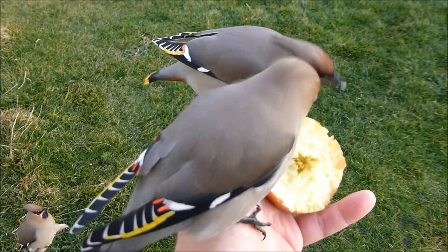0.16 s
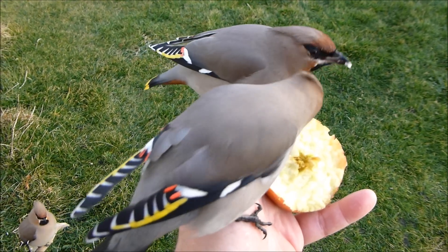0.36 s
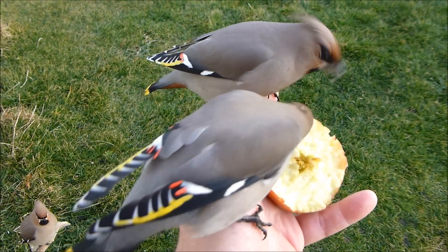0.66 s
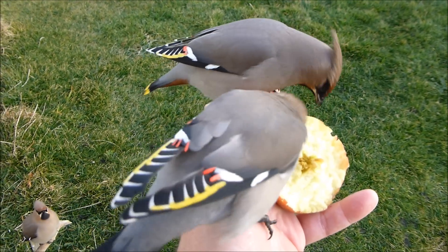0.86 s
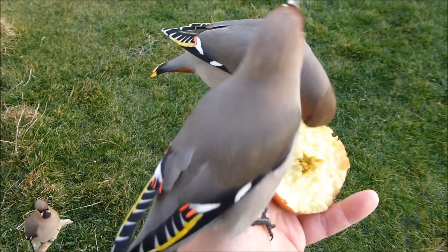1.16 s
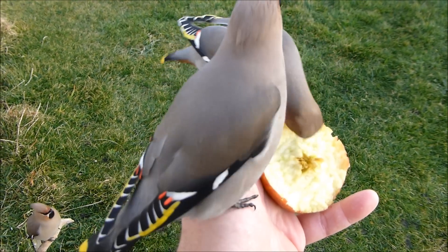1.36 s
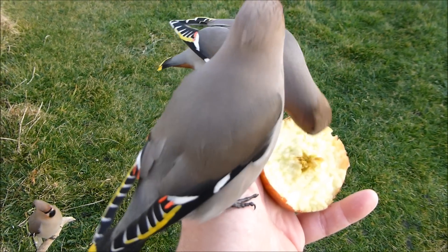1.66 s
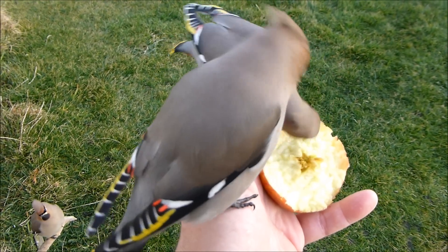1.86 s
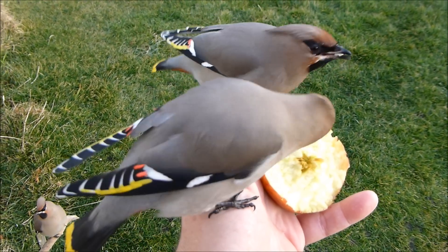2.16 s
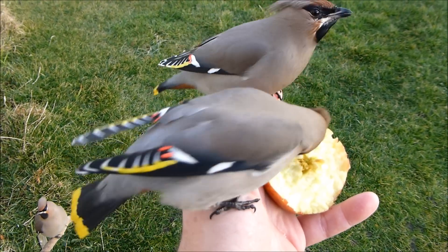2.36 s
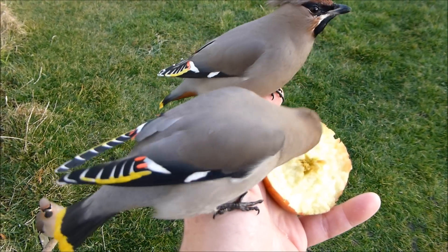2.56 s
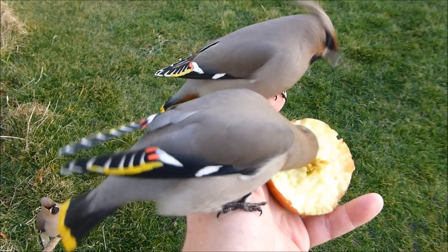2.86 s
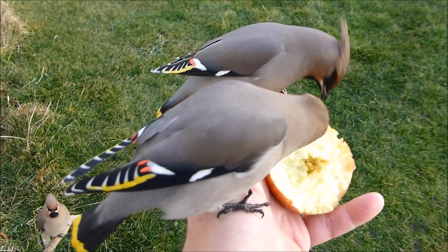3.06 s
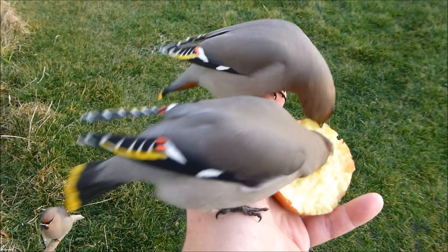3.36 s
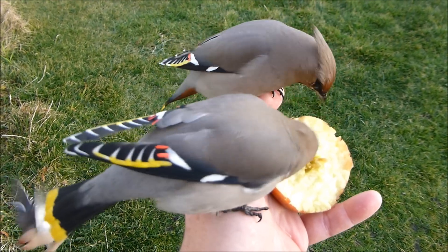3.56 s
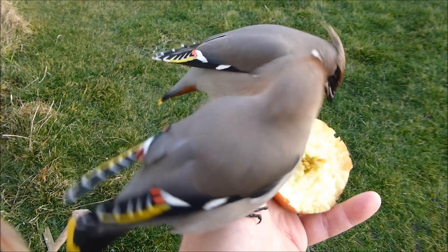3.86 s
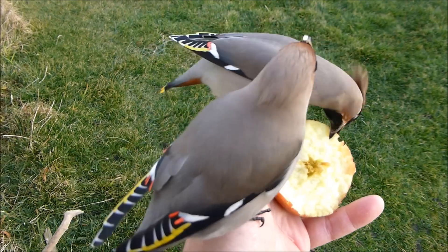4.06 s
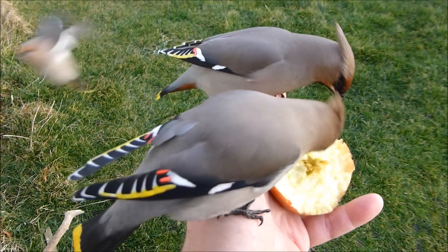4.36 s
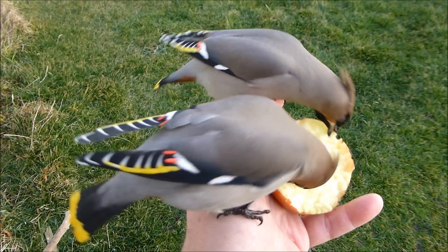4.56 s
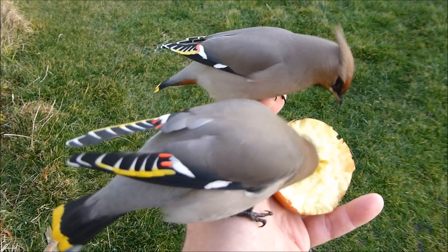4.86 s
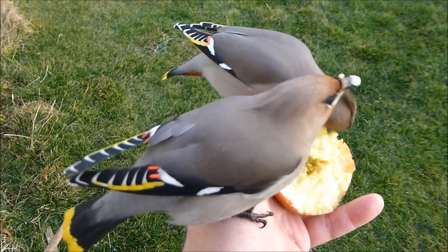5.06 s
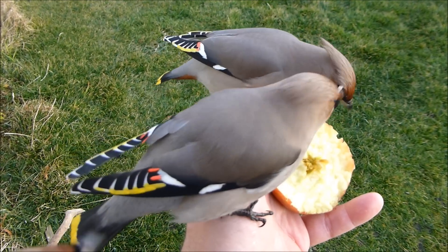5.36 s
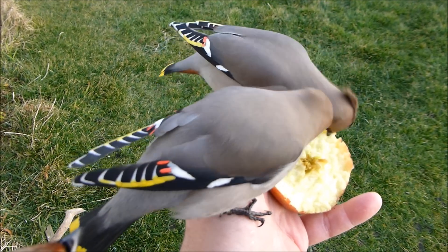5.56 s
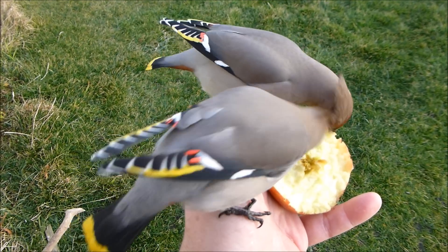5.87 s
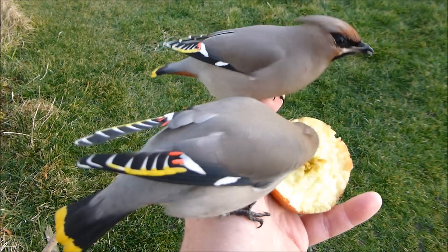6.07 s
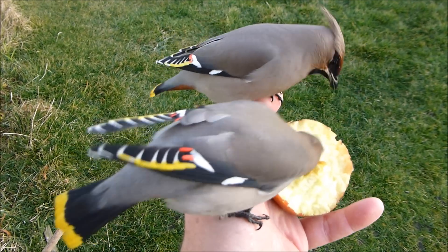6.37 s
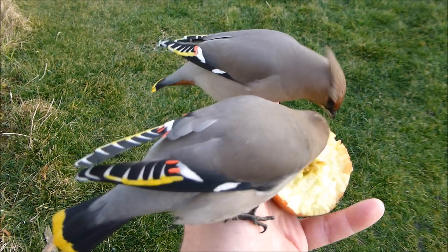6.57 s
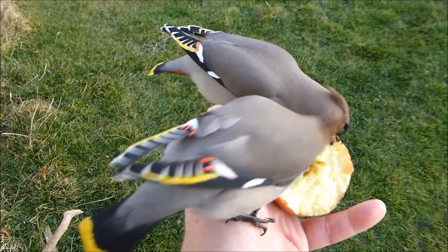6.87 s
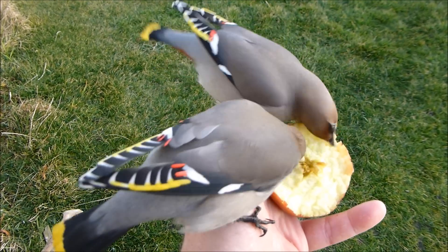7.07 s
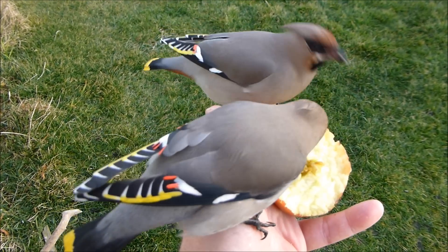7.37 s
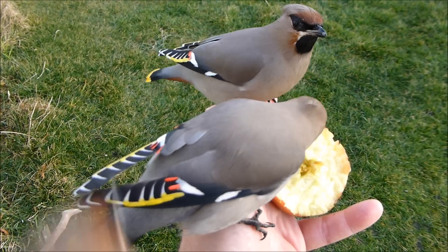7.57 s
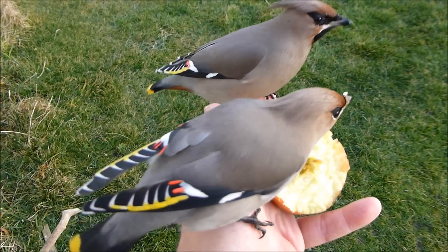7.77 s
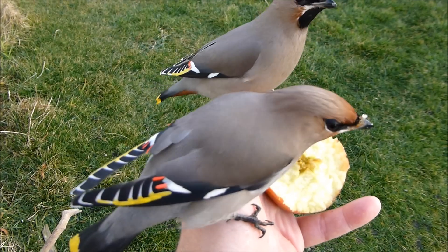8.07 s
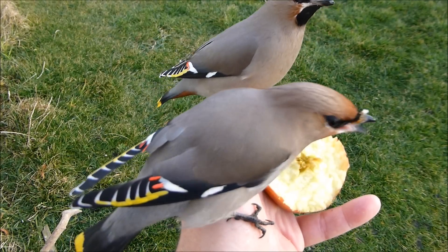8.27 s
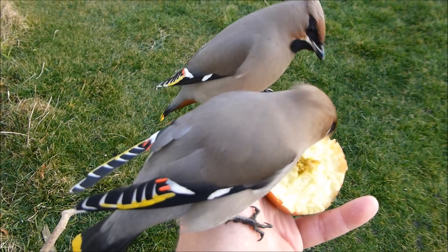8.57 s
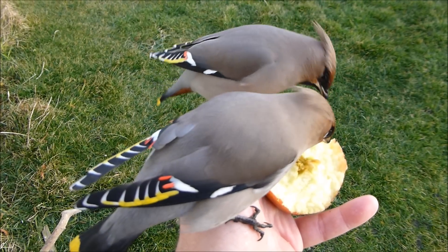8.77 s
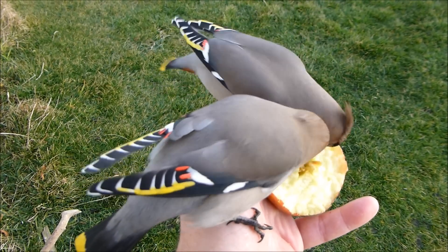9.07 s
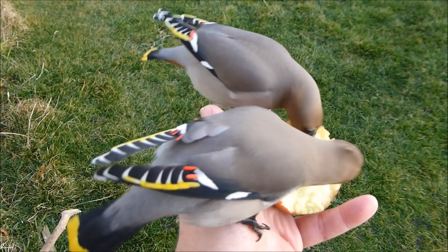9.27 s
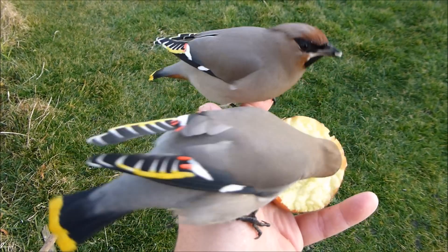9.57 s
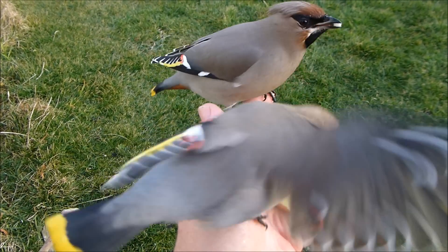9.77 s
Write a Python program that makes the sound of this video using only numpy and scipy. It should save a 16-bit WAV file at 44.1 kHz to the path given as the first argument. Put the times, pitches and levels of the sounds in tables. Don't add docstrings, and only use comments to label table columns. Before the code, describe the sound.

Small birds give short, high, downward-sliding trills while beaks tick and crunch at apple; handling bumps and one loud hard knock interrupt the quiet lawn.

```python
import sys
import numpy as np
from scipy import signal
from scipy.fft import rfft, irfft, next_fast_len
from scipy.io import wavfile
from scipy.ndimage import uniform_filter1d

SR = 44100
rng = np.random.default_rng(int(sys.argv[2]) if len(sys.argv) > 2 else 0)


def pcm_store(signal):
    levels = np.round(np.clip(np.atleast_2d(signal), -1, 1) * 32767)
    wavfile.write(sys.argv[1], SR, levels.astype(np.int16).T)


def how_loud(loudness_db):
    steps = np.asarray(loudness_db, float) / 20
    return 10 ** steps


N = 437031
TIME = np.arange(N) / SR
FFT_SIZE = next_fast_len(N)
BINS = np.maximum(np.arange(FFT_SIZE // 2 + 1) * SR / FFT_SIZE, 1)


def shaped(x, gain):
    return irfft(rfft(x, FFT_SIZE) * gain, FFT_SIZE)[:N]


def colour(x, points):
    hz, db = np.transpose(points)
    top_loss_db = 20 * np.clip((BINS - 15500) / 110, 0, 3)
    return shaped(x, how_loud(np.interp(np.log(BINS), np.log(hz), db) - top_loss_db))


def band(x, lo_hz, hi_hz):
    sos = signal.butter(3, [lo_hz, min(hi_hz, 0.45 * SR)], "bandpass", fs=SR, output="sos")
    return signal.sosfilt(sos, x)


def rms(x):
    return np.sqrt(np.mean(x ** 2))


def walk(rate):
    hold = int(SR / rate)
    targets = np.repeat(rng.standard_normal(N // hold + 1), hold)
    level = uniform_filter1d(targets, hold)[:N]
    return level / level.std()


def pan(db):
    gains = how_loud(np.array([db, -db]) / 2)
    return 2 * gains / gains.sum(0)


def add(out, s, sound, pan_db):
    i = int(s * SR)
    out[:, i:i + len(sound)] += pan(pan_db)[:, None] * sound[:N - i]


def grit(rate, flicker_db, spread_db, smear):
    breaks = (rng.random(N) < rate / SR) * how_loud(spread_db * np.minimum(rng.exponential(size=N), 2))
    breaks = signal.lfilter([1], [1, -min(smear, 0.999)], breaks)
    patches = how_loud(flicker_db * (walk(60) + 0.89 * walk(250)))
    return rng.standard_normal(N) * (1 + breaks) * patches


def tilted(x, bright_db):
    # (f/Hz, level/dB per Hz)
    rustle_colour = [(710, -36), (1200, -9), (1820, -4.5), (2150, -4), (4020, -1), (5790, -3),
                     (10100, -5.5), (14500, -11.5)]
    x = colour(x, rustle_colour)
    low, high = band(x, 990, 5160), band(x, 4820, 29000)
    low = low / rms(band(low, 1600, 4550))
    high = high / rms(band(high, 6570, 14100))
    return low + how_loud(bright_db) * high


def lawn():
    # (f/Hz, level/dB per Hz)
    lawn_colour = [(17, -24), (30, -15), (127, -8.5), (350, 0.6), (1630, -9.5), (3200, -17), (5000, -14.5),
                   (14500, -24)]
    # (f/Hz, likeness from 0 to 1)
    likeness = [(60, 0.5), (130, 0.84), (290, 0.93), (640, 0.33), (1410, 0), (3100, 0), (6820, 0.08),
                (15000, 0)]
    level_db = -55.5
    hz, like = np.transpose(likeness)
    like = np.clip(np.interp(np.log(BINS), np.log(hz), like), 0, 1)
    mid = shaped(colour(rng.standard_normal(N), lawn_colour), np.sqrt(1 + like))
    side = shaped(colour(rng.standard_normal(N), lawn_colour), np.sqrt(1 - like))
    both = np.array([1.08 * (mid + side), mid - side])
    low_breath = band(both, 100, 880) * (how_loud(1.9 * walk(4)) - 1)
    high_breath = band(both, 1900, 4300) * (how_loud(1.6 * walk(6) - 1.0) - 1)
    both = both + low_breath + high_breath
    return both * how_loud(level_db) / rms(both.mean(0))


def far_calls():
    # (t/s of the middle, half length/s, f/Hz, level/dB)
    calls = [
        (3.5, 0.13, 1640, -67),
        (5.58, 0.16, 1650, -65),
    ]
    flutter = walk(110)
    out = np.zeros(N)
    for s, half_s, hz, db in calls:
        swell = np.exp(-((TIME - s) / half_s) ** 2)
        phase = 2 * np.pi * np.cumsum(hz + 110 * walk(90)) / SR
        out += how_loud(db + 2.7 * flutter) * swell * np.sin(phase)
    return np.array([out, out])


def moves():
    # (t/s of the peak, rumble level/dB, swell/s by 10 dB, fade/s by 10 dB, cloth against rumble/dB)
    shifts = [(0.1, -57.5, -1, 1.3, -9), (.6, -53.5, 0, 0.2, -1.5), (.97, -46, 0.13, 0.27, -9.5),
              (1.12, -48, 0.16, 0.2, -14), (1.39, -44, 0.13, 0.1645, -6.5), (1.8, -56.5, 1.5, 0.04, -7),
              (2.6, -61, 1.5, -1, -25), (3.55, -55, -0.25, 0.6, -7), (3.85, -44.5, 0.18, 0.13, -5),
              (4.02, -51.5, 0.03, 0.65, -11), (4.55, -53.5, 0.25, 0.18, -3.5), (5.4, -60, 0.1, 0.2, -9.5),
              (5.85, -61.5, 0.2, 0.5, -8), (6.83, -62, 0.2, 1.5, 4.5), (7.4, -52, 0.1, 0.77, -4),
              (7.73, -36, 0.02, 0, -12), (7.78, -35, 0.0233, -0.0263, -28),
              (7.869, -32, 0.0532, -0.0869, -31), (7.94, -38, 0, -0.06, -25), (8.28, -79, 2, 7, -23),
              (8.62, -58.5, -0.7, -0.4, -27), (8.8, -69.5, 1, 2, 7.5), (9.9, -54, 0.5, 1.1, -6)]
    still_rumble_db, still_cloth_db = -67.5, -81
    rumble, cloth = how_loud(2 * still_rumble_db), how_loud(2 * still_cloth_db)
    t = TIME[::64]
    for s, db, swell_s, fade_s, cloth_db in shifts:
        distance = np.maximum((s - t) / abs(swell_s), (t - s) / abs(fade_s))
        power = how_loud(2 * db - 20 * distance)
        rumble = rumble + power
        cloth = cloth + power * how_loud(2 * cloth_db)
    return [np.interp(TIME, t, 10 * np.log10(p)) for p in (rumble, cloth)]


def sleeve():
    db = moves()[1]
    bright_db = 3 - 0.38 * (db + 62.0)
    near, stray = (how_loud(db) * tilted(grit(90, 1.56, 4.1, 0.897), bright_db) for _ in range(2))
    right_only = np.array([[0], [0.25]])
    return near * pan(12.8)[:, None] + right_only * stray


def handling():
    # (f/Hz, level/dB per Hz)
    body_colour = [(30, -53), (104, -4), (171, -0.5), (812, -3), (1590, -12.5), (2500, -15), (3250, -51),
                   (5500, -120)]
    # (breaks per s, flicker/dB, spread/dB, smear from 0 to 1)
    body_grain = (150, 1.8, 1.5, 0.99)
    db, cloth_db = moves()
    scrape_db = 2.5 + 0.48 * (cloth_db - db)
    out = 0
    for share in ([1.18, 0.95], [0.24, -0.17]):
        x = colour(grit(*body_grain), body_colour)
        low, high = band(x, 70, 387), band(x, 552, 2120)
        low = low / rms(band(low, 90, 356))
        high = high / rms(band(high, 520, 1530))
        out = out + np.array(share)[:, None] * (low + how_loud(scrape_db) * high)
    return out * how_loud(db - 1.5)


def swing(hz, cycles):
    t = np.arange(-1.5 * cycles / hz, 1.5 * cycles / hz, 1 / SR)
    return np.cos(2 * np.pi * hz * t - 0.6) * np.exp(-(2 * t * hz / cycles) ** 2)


def bumps():
    # (t/s, peak level/dB, f/Hz)
    touches = [(0.497, -37, 140), (0.275, -42, 180), (0.913, -41, 250), (1.108, -35, 250),
               (1.176, -37, 230), (1.374, -31, 360), (3.537, -35.5, 570), (3.577, -38, 200),
               (3.672, -37, 200), (3.722, -33.5, 200), (4.112, -36, 504), (4.125, -35, 400),
               (4.266, -40, 302), (7.62, -40, 247), (7.8706, -14, 300), (8.045, -34.5, 614),
               (0.514, -34, 850), (4.046, -38.5, 610), (7.734, -34, 1300), (7.79, -27, 230),
               (7.815, -24, 250), (7.843, -21, 258), (7.926, -28, 230), (7.937, -31, 220),
               (7.948, -25, 260), (7.992, -36, 200), (8.17, -46, 150), (8.261, -41, 130), (8.295, -46, 120),
               (9.064, -35, 790), (9.866, -37.5, 710), (0.574, -35, 840), (0.95, -27, 322),
               (1.026, -32, 230), (1.087, -29, 264), (1.144, -46, 231), (1.305, -30.5, 250),
               (1.325, -22, 937), (1.338, -27.5, 404), (1.385, -26, 840), (2.167, -38, 126),
               (3.626, -32.5, 640), (3.651, -33, 382), (3.759, -27.5, 780), (3.793, -27, 173),
               (3.858, -29, 171), (3.868, -26.5, 616), (7.3475, -22, 895), (7.774, -26, 202),
               (7.803, -27, 883), (7.826, -16, 310), (7.855, -16, 240), (7.8645, -13, 240),
               (7.88, -12, 203), (7.903, -14, 200), (7.959, -19.5, 194), (8.147, -34, 145),
               (8.544, -29.5, 143), (8.609, -29, 180), (8.628, -30.5, 168)]
    out, t = np.zeros((2, N)), np.arange(1300) / SR
    for s, db, hz in touches:
        noise = rng.standard_normal(len(t))
        add(out, s + 0.002 - 1.606 / hz, how_loud(db - 6.5) * swing(hz, 1.562), 30.)
        right_lead = (1.6 - 0.21 * noise[0]) / hz
        add(out, s + 0.002 - right_lead, how_loud(db - 6.5) * swing(hz, 1.614), -30.)
        scuff = band(noise, 0.66 * hz, 2.12 * hz) * np.exp(-((t - 0.012) / 0.012) ** 2)
        add(out, s - 0.009, how_loud(db - 5.5 - 2600 / hz) * scuff / abs(scuff).max(), 6.)
    return band(out, 72, 13000)


def knock():
    # (t/s, peak level/dB, f/Hz, cycles)
    swings = [
        (7.7413, 1, 1450, 1.1),
        (7.7422, 0.5, 620, 0.46),
        (7.7452, -4.5, 370, 0.66),
        (7.7496, -5.5, 368, 1.3),
    ]
    # (t/s, level/dB, length/ms)
    crack_setting = (7.7387, -3.5, 1.0)
    out, t = np.zeros((2, N)), np.arange(1300) / SR
    for k, (s, db, hz, cycles) in enumerate(swings):
        sign = -1 if k == 1 else 1
        moving = sign * swing(hz, cycles)
        add(out, s - 1.6 * cycles / hz, how_loud(db - 4.5) * moving, 30.)
        add(out, s - (1.66 * cycles - 0.15) / hz, how_loud(db - 6.5) * moving, -30.)
    s, db, ms = crack_setting
    crack = band(rng.standard_normal((2, len(t))), 740, 6300)
    crack = crack + 0.37 * band(rng.standard_normal((2, len(t))), 5500, 14000)
    first = np.exp(-((1000 * t - 3.3) / ms) ** 2)
    second = 0.2 * np.exp(-((1000 * t - 5.9) / 0.7) ** 2)
    crack = crack * (first + 0.1 * np.exp(-t / 0.0062) + second)
    add(out, s, how_loud(db) * crack[0], 12.)
    add(out, s, how_loud(db - 10.0) * crack[1], -30.)
    return band(out, 72, 13000)


def add_tick(out, s, db, hz, pan_db):
    t = np.arange(1000) / SR
    noise = rng.standard_normal((4, len(t)))
    splinters = np.minimum(np.repeat(noise[3, :20], 50) ** 2 + 0.3, 1.8)
    tail = 0.21 * splinters * np.exp(-t / (0.0038 + 0.00081 * abs(pan_db)))
    burst = noise[:3] * np.clip(t / 0.00044, 0, 1) * (np.exp(-t / 0.0012) + tail)
    burst[0, 4] += 1.77 + 0.28 * max(db + 28, 0)
    tick = 0.72 * band(burst, 1910, 12200)
    tick = tick + 0.83 * band(burst, hz / 1.4, hz * 1.325)
    tick = tick + 0.6 * band(burst, 4600, 5500)
    tick[0] += 0.11 * max(pan_db + 3.5, 0) * band(burst[2], 430, 2120)
    tick = tick * how_loud(db - 0.07) / abs(tick[0]).max()
    add(out, s, tick[0], pan_db)
    add(out, s, tick[1] * how_loud(-27.5 + abs(pan_db)), -pan_db)


def claws():
    # (t/s, peak level/dB, ring f/Hz, left minus right/dB)
    catches = [(0.5074, -25.5, 4900, 11.5), (0.5812, -26.5, 1770, 15), (0.9507, -21, 4600, 17.5),
               (1.07, -34.5, 1950, 20), (1.2398, -32.5, 5000, 17), (1.262, -28.5, 5730, 13),
               (1.3075, -38, 4850, 15), (0.957, -26, 3300, 13), (7.335, -29, 1500, 12),
               (7.7428, -5, 1500, 20), (7.843, -29, 800, 6), (7.873, -26, 1100, 5.5),
               (1.3263, -17.5, 4860, 18), (1.331, -23, 4830, 8), (1.4018, -26, 1530, 22),
               (1.4707, -27.5, 1920, 23), (1.521, -31.5, 1580, 25), (2.3036, -33, 5430, 4),
               (3.0937, -32, 7240, 6), (5.865, -36.5, 1700, 14), (3.8685, -23, 1670, 10),
               (5.373, -41.5, 5670, 7), (7.365, -26.5, 4650, 13), (7.6259, -26.5, 5040, 17),
               (7.805, -23, 3200, 8), (7.9098, -21.5, 3500, 6.5), (7.9763, -14.5, 4630, 6),
               (8.0454, -30, 4050, 10), (4.122, -39, 5030, 0), (4.26, -35, 11000, 3), (4.31, -44, 8000, 0),
               (3.387, -39, 5000, 0), (3.408, -33, 3700, -3), (3.436, -36, 3000, -2), (3.526, -34, 3000, 0),
               (3.546, -35, 3000, 0), (3.579, -41, 11000, 0), (8.643, -39, 10500, 0), (7.927, -38, 3200, 5),
               (1.09, -36, 2100, 16)]
    out = np.zeros((2, N))
    for s, db, hz, pan_db in catches:
        add_tick(out, s, db, hz, pan_db)
    return out


def snaps():
    # (t/s, peak level/dB, ring f/Hz, left minus right/dB)
    faint_snaps = [(0.1002, -39, 2840, 0), (0.16, -37, 6530, 7.0), (0.5154, -28, 4920, 5),
                   (0.636, -30, 5160, -3), (0.7164, -30, 2380, -1), (0.769, -32.5, 3700, 8),
                   (0.8194, -35, 4960, 3.5), (0.9126, -32.5, 4700, 10), (1.108, -35, 5400, 9.0),
                   (1.177, -33.5, 4090, 12), (1.2151, -33.5, 5320, 7), (1.8991, -37, 6410, 6.5),
                   (1.96, -36.5, 4920, 4), (1.9934, -35.5, 10500, 3), (2.141, -37.5, 3000, -0.5),
                   (2.2845, -40, 6600, 3), (2.464, -34, 2640, 0), (2.5388, -35.5, 3310, -4),
                   (3.6145, -32, 4150, 3), (3.7544, -30, 2440, 13), (3.819, -31, 4960, 14),
                   (3.935, -37, 8430, 2), (4.045, -34, 2480, 12), (4.1139, -35, 5180, 3),
                   (4.292, -33.5, 2500, 6), (4.7001, -30, 7000, 5), (4.7643, -30, 7740, 6),
                   (5.2644, -39, 2360, 1.5), (5.2794, -49, 8560, 3.5), (5.391, -39, 5520, 11),
                   (5.5528, -40, 5630, 9), (5.71, -35, 10800, 2), (5.842, -40, 5120, 7),
                   (6.0216, -33, 3000, 2), (6.1039, -32.5, 5030, 0), (6.3091, -36, 3080, -3),
                   (6.398, -33, 4090, -1), (6.524, -32, 2850, 2), (6.8178, -36, 4100, 9),
                   (6.883, -35.5, 4160, -5.5), (7.8361, -25, 2160, 6), (8.096, -33, 5990, 12),
                   (9.2496, -36, 3200, 3), (9.3855, -34.5, 7330, -1), (9.491, -35, 4150, 2),
                   (9.867, -37, 7520, -4)]
    out = np.zeros((2, N))
    for s, db, hz, pan_db in faint_snaps:
        add_tick(out, s, db - 2.5, hz, 1.35 * pan_db)
    return out


def beaks():
    # (t/s, peak level/dB, ring f/Hz)
    strikes = [(0.0406, -32.5, 3370), (1.836, -31, 3980), (0.6698, -22.5, 4900), (1.3874, -26.5, 5250),
               (1.854, -30, 8500), (2.4149, -25, 4800), (2.641, -39, 3500), (2.818, -26.5, 4570),
               (2.919, -37, 3000), (3.366, -27.5, 6290), (3.449, -35, 6700), (3.4994, -31, 1830),
               (3.567, -30.5, 5600), (4.129, -30, 1620), (4.581, -24, 6230), (4.781, -33, 7040),
               (4.8254, -32.5, 11000), (4.855, -33, 10900), (4.9242, -34, 10900), (5.166, -33, 5370),
               (5.684, -35, 5030), (5.9974, -24, 5800), (6.3704, -23.5, 8500), (6.412, -33, 2760),
               (6.794, -33, 9840), (6.996, -25, 5800), (7.056, -28, 6800), (9.063, -35, 5300),
               (9.1376, -31.5, 2440), (9.4728, -31, 4860)]
    out = np.zeros((2, N))
    for s, db, hz in strikes:
        add_tick(out, s, db, hz, -2)
    return out


def crunch():
    # (t/s, length/ms, level/dB, brightness/dB)
    bites = [(0.008, 51, -53.5, 1), (0.632, 71, -52.5, -4), (0.69, 102, -55, -2), (1.37, 33, -52, 4.5),
             (1.85, 85, -55.5, 2), (2.43, 40, -52, -5), (2.819, 58, -52.5, -0.5), (2.881, 43, -55, -9),
             (3.004, 18, -56, 0), (3.364, 47, -49.5, -2), (3.42, 75, -52, -1.5), (3.512, 63, -56, -11),
             (3.823, 42, -63, 0), (4.11, 50, -51.5, -5), (4.578, 57, -52, -1), (4.772, 21, -52, 2.5),
             (4.857, 18, -56.5, 8.5), (4.925, 31, -60.5, 10), (6.018, 50, -49, -2), (6.37, 90, -55, -1),
             (6.509, 36, -56.5, 2.5), (6.797, 64, -56, 5.5), (7.0, 290, -52, 1.5), (7.617, 58, -52.5, 2),
             (7.65, 89, -53.5, 3), (7.775, 170, -51, -1), (7.975, 28, -54, -3), (8.038, 30, -52, -11),
             (9.055, 80, -58.5, 0), (9.139, 39, -57, 5), (9.474, 66, -56, 3)]
    # (t/s, length/ms, level/dB)
    nibbles = [(1.95, 126, -64), (2.49, 120, -64.5), (4.17, 240, -59.5), (4.542, 18, -62.5),
               (4.64, 140, -61), (5.164, 71, -62), (5.375, 91, -64.5), (5.55, 37, -73), (5.71, 50, -66.5),
               (5.84, 47, -66.5), (2.3, 33, -61), (2.64, 25, -65.5), (9.79, 40, -60), (0.23, 100, -64),
               (6.075, 72, -61.5), (7.16, 440, -56.5), (7.714, 29, -55), (8.4, 190, -62), (8.964, 90, -63),
               (9.18, 160, -59), (9.562, 72, -58.5), (9.63, 280, -70)]
    nibble_bright_db, crumble_bright_db = 3, 2.0
    gain, bright_db = np.zeros(N), np.full(N, crumble_bright_db)
    crumble = how_loud(-8.5) * np.exp(-TIME[:SR // 4] / 0.14)
    rows = [(s, ms, db, nibble_bright_db) for s, ms, db in nibbles] + list(bites)
    for s, ms, db, tilt_db in rows:
        start, size = int(s * SR), int(ms * SR / 1000)
        sag = how_loud(np.linspace(1.2, -1.2, size))
        shape = how_loud(db) * np.r_[sag, crumble][:N - start]
        span = slice(start, start + len(shape))
        gain[span] = np.maximum(gain[span], shape)
        bright_db[start:start + size] = tilt_db
    gain = signal.lfilter([1 / 90], [1, -89 / 90], gain)
    bright_db = uniform_filter1d(bright_db, size=130)
    mid, side = (gain * tilted(grit(220, 1.8, 5.6, 0.91), bright_db) for _ in range(2))
    return np.array([mid + 0.089 * side, mid - 0.29 * side])


def whistle(t, ms, hz_range, singer, bend, db, flutter):
    top_hz, end_hz = hz_range
    from_hz, _, drop_hz, octave_db, _ = singer
    drop_ms, fade_db, curve = bend
    fall = np.clip((t - ms) / drop_ms + 1, 0, 1) ** 1.2
    fall = fall * fall * (3 - 2 * fall)
    slide = np.clip((t - 5.0) / (ms - 4.0), 0, 1) ** curve
    jump = max(top_hz - from_hz, 0) * np.exp(-(t / 2.45) ** 1.32)
    drop = drop_hz * (ms / 45) ** 0.38 * fall
    hz = top_hz + slide * (end_hz - top_hz) - jump - drop
    phase = 2 * np.pi * np.cumsum(hz) / SR
    shape = how_loud(db + fade_db * fall) * np.clip(t / 2.0, 0, 1) * np.clip((ms - t) / 2.6, 0, 1)
    octave = how_loud(octave_db + 2.3 * flutter) * (1 - fall) ** 2 * np.clip(t / 4.9, 0, 1)
    return shape * (np.sin(phase) + octave * np.sin(2 * phase))


def trills():
    # (t/s, length/ms, top f/Hz, level/dB, swell/dB)
    whistles = [
        [(1.563, 33, 6830, -43, 0), (1.606, 41, 7160, -39.5, -4), (1.655, 43, 7370, -38.5, -1.5),
         (1.71, 41, 7150, -37, -1.5)],
        [(3.286, 7.8, 5400, -46, 0), (3.299, 38, 6600, -36, -2), (3.366, 26, 6350, -44, -3),
         (3.397, 46, 7130, -36.5, -8), (3.459, 41, 6830, -39, -1), (3.521, 17, 6530, -46, -3)],
        [(4.38, 23, 6150, -45, 2), (4.42, 40, 6500, -57, 13), (4.467, 48, 6760, -55, 11),
         (4.523, 49, 6900, -53.5, 8), (4.585, 44, 6600, -50, 7), (4.645, 39, 6530, -50.5, 0)],
        [(6.995, 13, 6050, -40, -3), (7.019, 37, 6440, -36, -3), (7.069, 47, 6900, -37.5, -1.5),
         (7.124, 45, 6860, -40, -4), (7.198, 27, 6500, -47.5, -1)],
        [(7.985, 22, 6150, -36.5, -7), (8.047, 16, 6400, -41, -4), (8.105, 15, 6100, -43.5, 0)],
        [(8.491, 19, 5700, -39, 2), (8.517, 36.5, 6160, -37.5, 1), (8.558, 46, 6500, -35, 1),
         (8.608, 46.5, 6630, -34, 0), (8.66, 46.5, 6670, -33.5, -0.5), (8.712, 46, 6520, -35.5, 0),
         (8.763, 49, 6520, -35.5, -2)],
    ]
    # (f/Hz it jumps from, f/Hz where the slide ends, final drop/Hz, octave/dB, waver/dB)
    singers = [(5700, 6300, 780, -15, 3), (5700, 5950, 1450, -13.5, 1.5), (6300, 5950, 800, -26, 3),
               (5800, 5950, 800, -15, -0.5), (6000, 5800, 1000, -17, 2), (5040, 5850, 1700, -20, 1.5)]
    # (final drop/ms, fade in the drop/dB, curve of the slide: under 1 quick at first)
    bends = [(11, -10, 0.98), (12, -6, 0.91), (10.5, -10, 1.0), (12, -9, 0.9), (9, -8, 1.1), (8.2, -6, 0.7)]
    # (left minus right/dB, clear echo/dB, blurred echoes/dB)
    perches = [(12, -8, -7), (-5, -16, -9), (12, -9, -17), (12, -18, -10), (3, -14, -22), (13, -8, -13)]
    out, waver, flutter = np.zeros((2, N)), np.clip(walk(260), -1.5, 1.5), walk(110)
    lag = np.arange(1500) / SR
    blur = rng.standard_normal(len(lag)) * np.exp(-lag / 0.02) * (lag > 0.003)
    blur = blur / np.sqrt(np.sum(blur ** 2))
    for notes, singer, bend, (pan_db, echo_db, blur_db) in zip(whistles, singers, bends, perches):
        middle = np.mean([note[0] for note in notes])
        knee_hz, waver_db = singer[1], singer[4]
        for s, ms, top_hz, level_db, swell_db in notes:
            t = np.arange(int(ms * SR / 1000)) * 1000 / SR
            span = slice(int(s * SR), int(s * SR) + len(t))
            tired_hz = 490 * (s - middle)
            end_hz = min(knee_hz - 100 - tired_hz, top_hz)
            swell = np.interp(t, [0.24 * ms, 0.67 * ms], [0, swell_db])
            db = level_db + swell + waver_db * waver[span]
            note = whistle(t, ms, (top_hz, end_hz), singer, bend, db, flutter[span])
            add(out, s, note, pan_db)
            add(out, s + 0.0069, note * how_loud(echo_db), 0.6 * pan_db)
            add(out, s, signal.fftconvolve(note, blur) * how_loud(blur_db), 0.6 * pan_db)
    return out


def scene():
    background = lawn() + far_calls()
    hand = sleeve() + handling() + bumps() + knock()
    pecking = claws() + snaps() + beaks() + crunch()
    return background + hand + pecking + trills()


def roll_off(x):
    return signal.sosfilt(signal.butter(12, 16500, fs=SR, output="sos"), x)


def record(dry):
    clipped = np.clip(dry, -0.94, 0.94)
    top_cut = signal.ellip(10, 0.1, 85, 16150, fs=SR, output="sos")
    mix = signal.sosfilt(top_cut, clipped)
    return roll_off(mix)


dry = scene()
out = record(dry)
pcm_store(out)
```